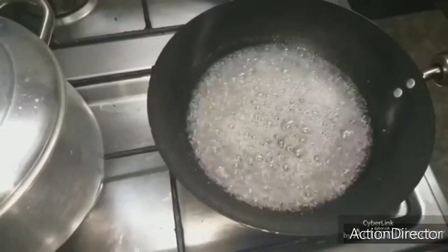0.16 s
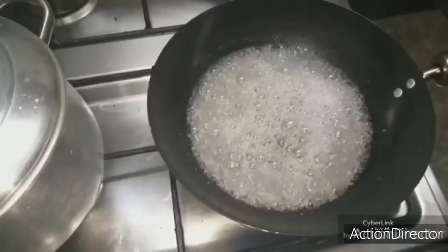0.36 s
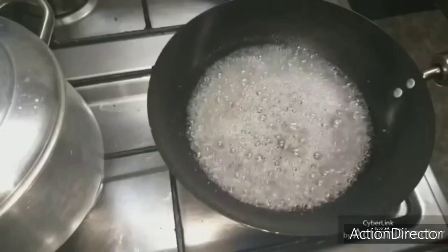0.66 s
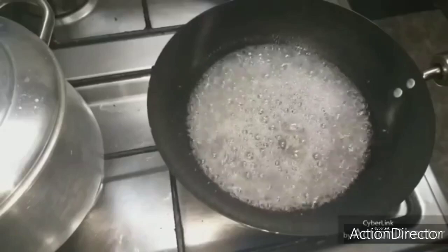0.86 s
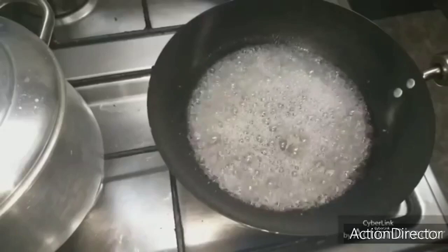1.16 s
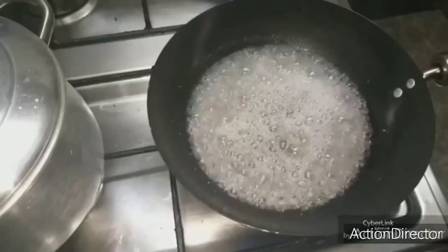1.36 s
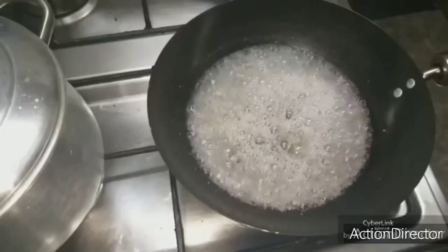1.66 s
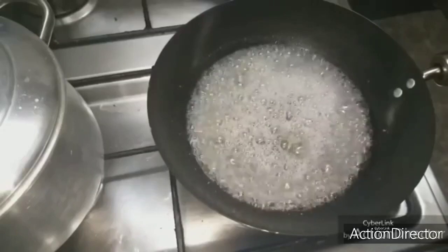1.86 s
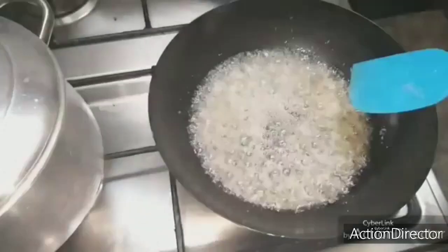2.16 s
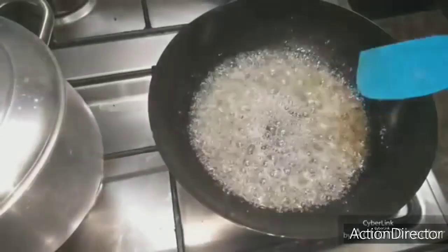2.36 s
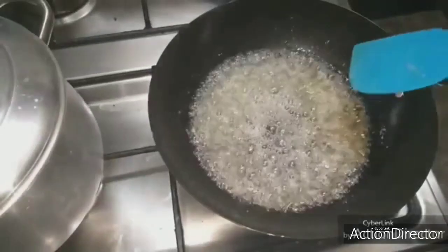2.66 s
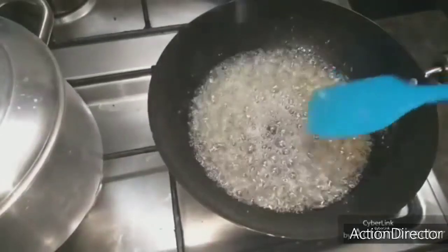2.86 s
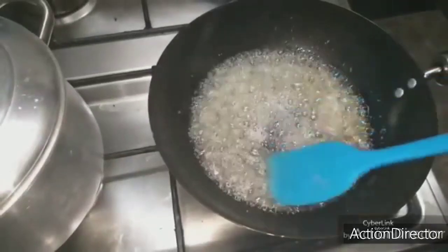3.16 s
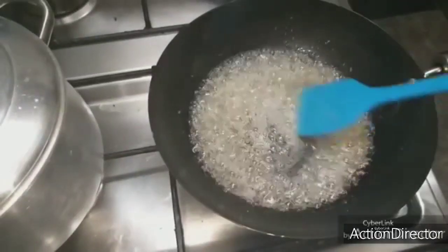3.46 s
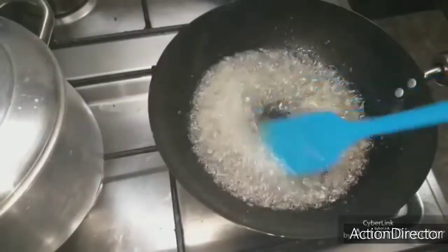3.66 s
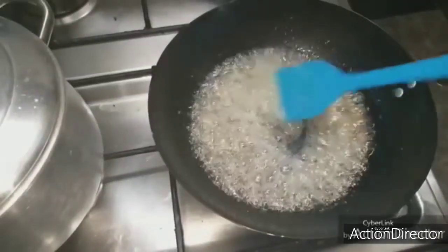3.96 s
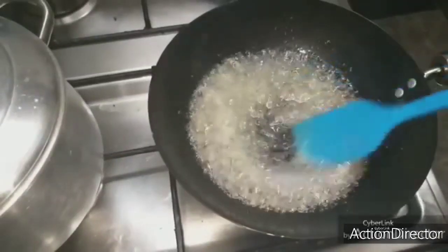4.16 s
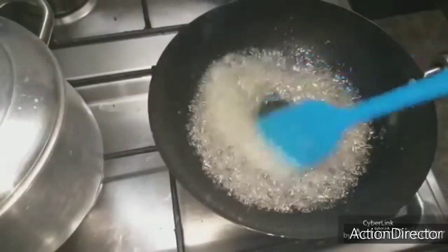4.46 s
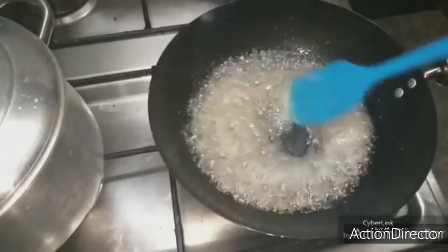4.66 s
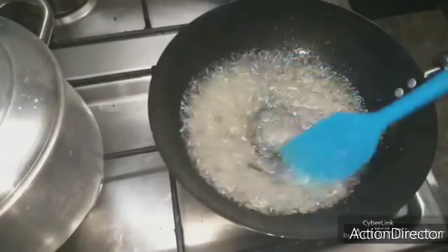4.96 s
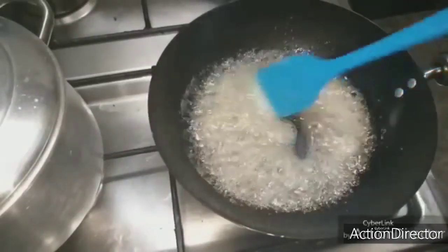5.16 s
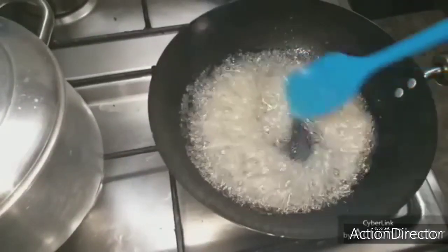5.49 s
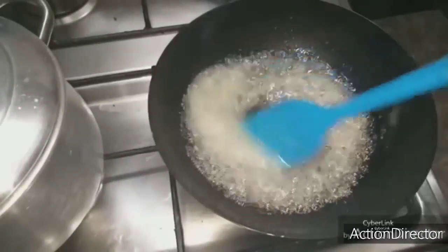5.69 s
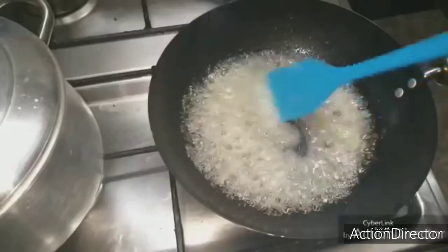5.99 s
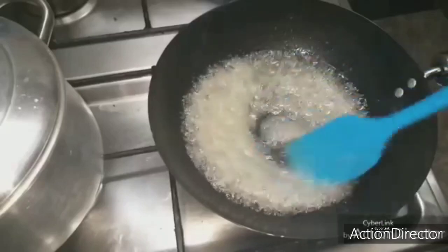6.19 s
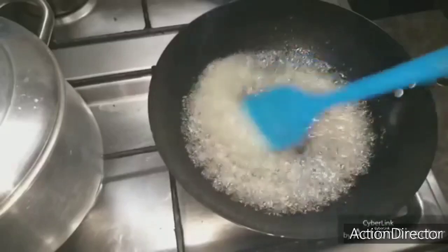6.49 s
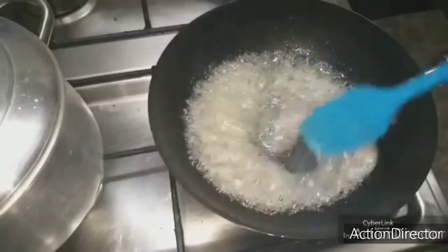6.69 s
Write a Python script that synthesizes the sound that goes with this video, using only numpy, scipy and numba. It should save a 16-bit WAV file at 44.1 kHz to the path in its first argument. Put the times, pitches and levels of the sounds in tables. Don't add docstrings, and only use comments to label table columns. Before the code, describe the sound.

Sugar syrup boils hard in a pan with dense bright sizzling, then abruptly drops to a quieter flame hiss as a spatula stirs fizzing foam.

```python
import sys
import numpy as np
from scipy import signal
from scipy.fft import rfft, irfft
from scipy.io import wavfile
from scipy.ndimage import uniform_filter1d
from numba import njit

SR = 44100
rng = np.random.default_rng(int(sys.argv[2]) if len(sys.argv) > 2 else 0)


def ratio(d):
    e = np.asarray(d, float) / 20
    return 10 ** e


def dump_mix(stems):
    frames = np.atleast_2d(stems).T
    limited = np.clip(frames, -1, 1)
    pcm = np.round(limited * 32767).astype(np.int16)
    wavfile.write(sys.argv[1], SR, pcm)


N = 301203
T = np.arange(N) / SR
HZ = np.maximum(np.arange(N // 2 + 1) * SR / N, 1)
CUT_S = 2.227
TOP_HZ = 15010

# time_s, level_db
BOIL = [(0, -1.2), (.42, 0.8), (.8, -0.2), (1.4, 0), (1.75, 1), (2.05, 0), (2.23, -0.5)]
# time_s, level_db
STIR = [(2.23, -3.5), (2.9, -8.5), (3.3, -4), (3.7, -2.5), (4.1, -3), (4.5, -2.5), (4.8, 0.5), (5.2, 1),
        (5.5, 0.5), (5.7, -2), (6.0, -2.5), (6.6, -3), (6.83, 0.5)]
# time_s, level_db
FLAME = [(2.23, -1.5), (3.7, -0.5), (4.2, -1), (4.75, 3), (5.3, -0.2), (5.8, -1), (6.4, -2), (6.83, 0.5)]

# freq_hz, density_db (per Hz)
BOIL_COLOUR = [(18, -63), (30, -25), (64, -15.5), (87, -12.5), (183, 0), (238, -9.5), (315, -4),
               (629, -9.5), (787, -3), (1300, -11), (1930, -9.5), (2600, -8.5), (3380, -44), (5720, -120)]
# freq_hz, density_db (per Hz)
STEAM_COLOUR = [(1350, -32), (2300, 0.5), (2590, -3.5), (3560, -3), (4010, 0), (4800, -3), (6350, -3),
                (9110, -5), (10500, -10), (12400, -8), (14900, -11)]
# freq_hz, density_db (per Hz)
FLAME_COLOUR = [(18, -55), (30, -12), (64, -12.5), (96, -0.5), (181, 0), (237, -9), (328, -13),
                (375, -16.5), (437, -15), (620, -15.5), (790, -9), (1250, -16), (1830, -4.5), (2900, -14),
                (3770, -47), (6380, -120)]
# freq_hz, density_db (per Hz)
GAS_COLOUR = [(1530, -43), (2600, -15.5), (3210, -10), (3430, -9.5), (3830, -1), (4560, -14), (4700, -7),
              (4980, -9.5), (6430, -1), (7070, -7.5), (8740, -5.5), (9680, 0.5), (10600, -6), (14200, -8),
              (14900, -16.5)]
# freq_hz, level_db
FLAT = [(1, 0), (2, 0)]
# freq_hz, level_db
TILES = [(1200, -40), (2500, 0), (14000, 4)]
# freq_hz, width_hz, lift_db
HOLLOWS = [(98.2, 4.7, 10), (155, 12, -1), (176, 8.4, 1), (194.3, 33, 5), (281.4, 22, 5.5),
           (316.3, 5.8, 7.5), (455.3, 9.6, 6), (790, 58, 3.5), (908, 9.6, 7), (1055, 40, 4),
           (1470, 31, 1.5), (1950, 94, 4.5)]

# start_s, peak_db, pitch_hz
BOIL_POPS = [(0.0684, -30, 5800), (0.3616, -35, 4500), (0.4345, -24.5, 8400), (0.526, -31, 4070),
             (.6295, -27, 8000), (.9552, -29, 6800), (0.986, -34, 6240), (.7996, -26.5, 7650),
             (1.063, -27, 8030), (1.0843, -31, 3960), (1.432, -28, 6070), (1.5708, -33, 4630),
             (1.6417, -35, 6100), (1.938, -34, 4100), (2.0575, -31.5, 4470), (2.176, -33, 6430),
             (2.184, -32, 5100)]
# start_s, peak_db, pitch_hz
BOIL_SNAPS = [(0.2722, -31, 5001), (0.2867, -32, 5030), (0.2985, -40, 11400), (0.3776, -31, 5800),
              (0.4101, -32, 5745), (0.5643, -33, 3790), (0.7865, -33, 9000), (0.8051, -32, 7581),
              (1.0046, -37, 5745), (1.0395, -31, 4320), (1.1123, -32, 11491), (1.1509, -31, 11491),
              (1.1722, -35.6, 11491), (1.2949, -33, 8708), (1.3019, -36, 6600), (1.3978, -42, 3790),
              (1.4085, -30, 11491), (1.4155, -33, 5745), (1.4824, -34.8, 8708), (1.5287, -35, 4354),
              (1.6552, -38.1, 3760), (1.7806, -40, 11491), (1.8806, -30.5, 4430), (1.9053, -29, 10003),
              (1.9502, -33, 11491), (1.9609, -37, 3300), (2.0994, -34.4, 7581), (2.1409, -30, 11491),
              (2.1974, -36, 6600), (2.2148, -37, 3800)]
# start_s, peak_db, pitch_hz
POPS = [(2.8826, -39, 5320), (2.9284, -36, 5570), (3.3929, -39, 7610), (3.753, -33, 5000),
        (3.865, -35, 4900), (4.063, -32, 5800), (4.2325, -28, 5470), (4.337, -32, 6500),
        (4.392, -32.5, 6170), (4.5045, -31.5, 4770), (4.52, -36, 4200), (4.6325, -33, 4760),
        (4.7985, -35, 5550), (4.9287, -37, 4030), (4.9557, -44, 6150), (5.0121, -35, 4860),
        (5.2968, -37, 4960), (5.3194, -31.5, 5840), (5.3982, -44, 6300), (5.506, -32, 5600),
        (5.6212, -34, 4870), (5.7168, -30.5, 4800), (5.8498, -37.5, 4630), (6.0417, -37, 5600),
        (6.256, -35, 6810), (6.367, -27, 6300), (6.4149, -37, 6100), (6.4834, -35, 6380),
        (6.6697, -34, 4100), (6.6798, -34.5, 5970)]
# start_s, peak_db, pitch_hz
SNAPS = [(2.5171, -47, 11491), (2.6933, -41, 6600), (2.8513, -42, 7581), (3.0287, -51.4, 4354),
         (3.2209, -48, 5745), (3.2906, -44, 6600), (3.3654, -42.6, 5750), (3.6615, -41.0, 11470),
         (3.6695, -46.0, 5001), (3.6735, -41, 6600), (3.6976, -44, 5001), (3.7241, -42, 6600),
         (3.7831, -45, 7581), (3.8801, -48, 5745), (3.8896, -48.8, 5001), (3.9581, -42.9, 5001),
         (3.964, -47.9, 3790), (3.9906, -41, 5745), (4.0112, -40, 5001), (4.0915, -47.4, 5001),
         (4.1822, -46, 10003), (4.2005, -47, 3790), (4.2121, -40, 6550), (4.2881, -46, 4354),
         (4.3085, -48, 4354), (4.3175, -45, 5745), (4.3497, -42, 4354), (4.4023, -43, 3790),
         (4.4398, -44.3, 5745), (4.5711, -44, 3300), (4.5817, -41, 6560), (4.6862, -43, 4354),
         (4.7384, -45, 3280), (4.786, -42, 3260), (4.8783, -44, 3250), (4.8847, -42, 4880),
         (4.9674, -41.6, 5745), (5.1491, -36, 10003), (5.1531, -41, 3260), (5.2112, -41.9, 5001),
         (5.23, -43.9, 4354), (5.3287, -38, 5745), (5.3511, -44, 3800), (5.3636, -45.1, 5745),
         (5.3722, -48, 6600), (5.4062, -49, 3790), (5.4457, -43.8, 5001), (5.5497, -46.7, 6600),
         (5.6071, -45, 5001), (5.657, -44.2, 5745), (5.7813, -46, 4380), (5.8432, -42, 5745),
         (6.0631, -46, 4354), (6.2003, -49, 6600), (6.245, -48.8, 5001), (6.2765, -43.1, 5001),
         (6.3729, -59, 3790), (6.396, -45.3, 5001), (6.5203, -52, 5001), (6.7565, -46, 3770)]
# start_s, peak_db, pitch_hz
PINPRICKS = [(.0692, -35, 9420), (.1351, -34, 9450), (0.4564, -29, 8000), (0.461, -28, 8700),
             (0.654, -29, 11800), (.689, -30, 13500), (0.9865, -28, 8800), (1.0844, -27.5, 8100),
             (1.465, -30, 9060), (1.5716, -29, 9200), (1.7424, -28, 9110), (1.8148, -33, 9050),
             (4.2268, -32.5, 8230), (4.6498, -39, 8490), (4.6499, -27, 7160), (5.43, -39, 2960),
             (5.436, -32, 9190), (2.4065, -39, 5000), (2.4617, -40, 4230), (3.0465, -40, 5500),
             (3.5584, -39, 5200), (5.677, -34, 8050), (5.825, -40, 4480), (6.224, -35, 9960),
             (6.355, -35, 9950), (6.7905, -32, 13200), (6.7955, -36, 7200)]
# start_s, peak_db, pitch_hz
TICKS = [(4.527, -38.5, 1550), (4.5394, -43, 2000), (4.568, -46, 1850), (4.5927, -38, 2200),
         (5.154, -42, 1900), (5.328, -38, 1830), (5.414, -41, 1900), (6.3735, -44, 1860)]
# centre_s, half_length_s, centre_hz,
# level_db
SWISHES = [(2.47, .043, 4300, -64), (3.65, 0.044, 4300, -64), (4.01, 0.04, 3980, -58.5),
           (4.30, .04, 5800, -63), (4.43, 0.053, 5170, -59.5), (4.506, .03, 4500, -74),
           (4.797, 0.018, 5500, -59), (4.96, 0.018, 6200, -61), (5.014, 0.046, 4740, -57),
           (5.141, 0.046, 3930, -54), (5.145, 0.083, 2000, -59), (5.217, 0.026, 4770, -62),
           (5.42, .022, 4580, -57.5), (5.638, 0.072, 4670, -63), (5.854, 0.036, 4600, -67),
           (6.273, 0.027, 4840, -63), (6.436, 0.038, 5030, -57), (6.688, 0.027, 4430, -60.5)]
# start_s, held_s, pitch_hz, level_db, unsteadiness_db
SQUEAKS = [(4.388, 0.046, 1365, -59.5, 1), (4.43, .02, 1376, -64, 2), (4.458, .016, 1380, -67, 1.5),
           (4.562, 0.019, 800, -65, 3), (4.618, .008, 1880, -60, 5), (4.63, 0.015, 1770, -58, 1.5),
           (5.948, 0.024, 1570, -66, 2.5), (6.44, 0.016, 800, -68, 2), (6.445, 0.039, 1470, -71, -2),
           (6.662, 0.015, 1550, -60, -4), (6.666, .008, 1050, -61, 2), (6.679, 0.033, 1035, -64, 4),
           (6.713, .03, 1046, -66, -4), (6.69, .04, 1620, -72, 3)]

# start_s, ring_db, contact_s, room_db
KNOCKS = [
    (2.6, -41, .0015, -55.5),
    (4.6504, -26, 0.0019, -42.5),
    (5.4299, -36, 0.00056, -47.5),
    (6.791, -52, .0006, -60),
]
# pitch_hz, level_db, t60_s
THUD = [(96, -22, 0.06), (148, 0, 0.068), (330, -15, 0.018), (534, -6, 0.03), (804, -7, 0.032)]
# pitch_hz, level_db, t60_s
RAP = [(107.6, -28, 0.56), (800, 2.5, 0.018), (1240, -7, 0.05), (1470, -11, 0.029), (2000, -15.5, 0.12),
       (2810, -18, 0.033), (4300, 3, 0.0068), (6000, 4.5, 0.011), (6750, -4, 0.026)]
# pitch_hz, level_db, t60_s
TAP = [(1850, -1, 0.034), (2450, -4, 0.025), (3000, -7, .016), (4000, -2, .016), (4900, -4, .012)]
# pitch_hz, level_db, t60_s
TINKLE = [(5800, 1, .04), (7250, -5, 0.09), (8400, -1, .06), (12800, 0, .025), (13640, 0, .2),
          (13850, -1.5, .12), (14500, -4, .04)]
# freq_hz, density_db (per Hz)
TAILS = [
    [(41, -40), (75, -4), (120, -0.5), (172, -4), (257, -12), (663, -11), (741, -12), (1000, -15),
     (1300, -42), (2200, -120)],
    [(41, -48), (75, -17), (105, -4), (265, -11.5), (560, -12), (800, -12), (1080, -7), (1220, -4.5),
     (1700, -6.5), (2000, -5.5), (2610, -12), (2880, -13), (7500, -16.5), (9750, -28), (16500, -120)],
    [(41, -39), (70, -19), (297, -1), (508, -4), (676, -2.5), (1480, -3), (1740, -0.5), (3440, -12),
     (5000, -13), (6500, -45), (11000, -120)],
    [(2940, -44), (5000, -11), (6960, -1), (9880, -4), (11500, -11), (14000, -5), (14800, -21)],
]
# start_s, peak_db, pitch_hz, length_cycles
PAN_RINGS = [(.46, -52, 450, 27), (.13, -47, 790, 28), (2.603, -46, 155, 1), (2.603, -41.5, 820, 2.4),
             (2.61, -49, 850, 3), (2.615, -50, 420, 1.4), (2.62, -48, 140, 2.5), (2.612, -51, 430, 3),
             (2.626, -52, 450, 3), (2.641, -51, 160, 1.6), (2.676, -51, 170, 1.4), (2.697, -49, 190, 1.1),
             (2.724, -54, 155, 1.6), (4.6533, -28, 1310, 2.3), (4.664, -45, 1240, 2.5),
             (4.667, -37, 1700, 2.5), (4.679, -36, 800, 3), (4.6522, -33.5, 800, 2.6),
             (4.6625, -36, 950, 1.5), (4.686, -40, 1900, 2.5), (4.705, -36, 2050, 5), (5.434, -40, 1790, 5),
             (5.439, -46, 1800, 4), (5.4415, -43.5, 695, 2.3), (5.446, -46, 1500, 2.5), (5.455, -45, 2500, 3),
             (5.47, -42, 700, 2), (5.479, -49, 910, 2.7), (5.5, -59, 500, 2.8), (5.51, -45, 1590, 4),
             (5.525, -46, 1640, 5), (5.458, -48, 1850, 4), (5.489, -43, 1700, 2.7)]
# freq_hz, t60_s
KITCHEN_T60 = [(100, 0.49), (500, 0.44), (1500, 0.37), (5000, 0.26), (14000, 0.082)]
# centre_hz, width_hz, in_step_share, unrelated_share
SIDE_BANDS = [(30, 47, 0.093, 0.11), (500, 470, 0, 0.0051), (1915, 263, 0.24, 0.19), (6300, 3000, 0, 0.012),
              (9760, 690, -0.17, 0.22)]

FIZZ_DB, BURBLE_DB, ROAR_DB = -46.5, -50.5, -59
FOAM_DB, SCRAPE_DB = -61, -64
FOAM_FOLLOWS, SCRAPE_FOLLOWS = 1.06, 1
SWISH_WIDTH = 0.52
RUMBLE_DB, BODY_DB, WHISTLE_DB, GAS_DB = -65, -68.5, -70.5, -59
BODY_FOLLOWS, WHISTLE_FOLLOWS, GAS_FOLLOWS = 1, 0.89, 0.077
SING_DB, WHISTLE_SETTLES_S = -66, 0.96
CRACKLE_DB, CRACKLE_SCATTER_DB, CRACKLE_FOLLOWS = -49, 2, 0.31
CRACKLE_LO_HZ, CRACKLE_HI_HZ = 3830, 6860
CRACK_DB = 0
SNAP_LIFT_DB, BOIL_SNAP_LIFT_DB = 3.5, 0.5
SPIT_DB, SPIT_S, SPIT_SPREAD = -7, .006, 0.22
WAVER = .016
PATCH_RATE = 6
BOIL_ROOM_DB, FLAME_ROOM_DB, SQUEAK_ROOM_DB = -15, -11, -10


def boil():
    vigour_db, = curves(BOIL)
    small = bubbles(count=22000, lo_hz=2500, hi_hz=16000, cycles=1.8, spread_db=2.5)
    fizz = ratio(-8.0) * small + ratio(-5.0) * hiss(0.65, 25.53, patchy_db=0.8)
    fat = bubbles(count=3000, lo_hz=295, hi_hz=2890, cycles=1.9, spread_db=1.5)
    burble = ratio(-18.5) * fat + hiss(0.85, 24.15)
    fizz_db = FIZZ_DB + vigour_db + 1.25 * walk(29.56) + 0.69 * walk(12.02)
    out = ratio(fizz_db) * band(fizz, 2430, 15000, STEAM_COLOUR)
    out += ratio(BURBLE_DB + vigour_db) * band(burble, 464, 2340, BOIL_COLOUR)
    return out + ratio(ROAR_DB) * band(hiss(3.0, 9.8), 10, 367, BOIL_COLOUR)


def stirring():
    effort_db, = curves(STIR)
    fizz = bubbles(count=20000, lo_hz=3440, hi_hz=8000, cycles=1.8, spread_db=3.0)
    out = ratio(FOAM_DB + FOAM_FOLLOWS * effort_db) * ratio(2.0 * walk(40)) * fizz
    out += swishes()
    grains = bubbles(count=5000, lo_hz=594, hi_hz=3280, cycles=2.3, spread_db=0.5)
    drag = ratio(-15.0) * grains + hiss(2.4, 30)
    scrape = band(drag, 840, 4000, [(900, -7.5), (1600, 3.5), (3000, -9.0)])
    return out + ratio(SCRAPE_DB + SCRAPE_FOLLOWS * effort_db) * scrape


def swishes():
    out = np.zeros(N)
    foam = rfft(bubbles(count=60000, lo_hz=800, hi_hz=9260, cycles=2.9, spread_db=3.0))
    for s, half, hz, db in SWISHES:
        part = irfft(foam * np.exp(-(2 * (HZ / hz - 1) / SWISH_WIDTH) ** 2 / 2), N)
        shape = np.exp(-((T - s) / half) ** 2)
        rms = np.sqrt(np.sum((shape * part) ** 2) / np.sum(shape ** 2))
        out += ratio(db) * shape * part / rms
    return out


def pops():
    s, db, hz = np.transpose(BOIL_POPS + POPS + PINPRICKS + crackle(count=36))
    out = rings(s + .0005, .94 * hz, 2.1 / hz, 1.8 / hz, ratio(db + 6.), .06)
    out += ratio(CRACK_DB) * rings(s + .0005, 1.35 * hz, 1.1 / hz, .6 / hz, ratio(db), 0.)
    for snaps, lift_db in (SNAPS, SNAP_LIFT_DB), (BOIL_SNAPS, BOIL_SNAP_LIFT_DB):
        s, db, hz = np.transpose(snaps)
        out += ratio(lift_db) * rings(s + .0002, .95 * hz, 2.1 / hz, 1.7 / hz, ratio(db + 5.), .06)
    out += spits(BOIL_POPS + BOIL_SNAPS + PINPRICKS[:11])
    s, db, hz = np.transpose(TICKS)
    return out + rings(s, hz, 0.88 / hz, 0.43 / hz, ratio(db + 6.5), 0.)


def crackle(count):
    when, pitch, big = rng.random((count, 3)).T
    s = CUT_S + (N / SR - CUT_S) * when
    effort_db = np.interp(s, *np.transpose(STIR))
    db = CRACKLE_DB + CRACKLE_FOLLOWS * effort_db + CRACKLE_SCATTER_DB * (2 * big - 1)
    hz = CRACKLE_LO_HZ * (CRACKLE_HI_HZ / CRACKLE_LO_HZ) ** pitch
    return list(zip(s, db, hz))


def spits(bursts, count=7):
    s, db, hz = np.repeat(bursts, count, axis=0).T
    late, pitch = rng.random((len(s), 2)).T
    hz = np.minimum(hz * (1 + SPIT_SPREAD * (2 * pitch - 1)), TOP_HZ)
    return rings(s + SPIT_S * late, hz, 3.1 / hz, 1.6 / hz, ratio(db + SPIT_DB), 0.036)


def squeaks():
    out = np.zeros(N)
    for s, held, hz, db, unsteady_db in SQUEAKS:
        age = np.maximum(T - s, 0)
        shape = (1 - np.exp(-age / 0.008)) * np.exp(-(age / held) ** 4)
        phase = 2 * np.pi * np.cumsum(hz * (1 + WAVER * walk(200))) / SR
        out += ratio(db + 9.5 + unsteady_db * walk(100)) * shape * np.sin(phase)
    return walled(out, SQUEAK_ROOM_DB, FLAT)


def knocks():
    s, db, hz, cycles = np.transpose(PAN_RINGS)
    out = rings(s, hz, cycles / hz, 0.098 / hz, ratio(db), 0.)
    for (s, db, contact, room_db), modes, tail in zip(KNOCKS, (THUD, RAP, TAP, TINKLE), TAILS):
        hz, mode_db, t60 = np.transpose(modes)
        sign = (-1.) ** np.arange(len(hz))
        size = sign * ratio(db + mode_db)
        ring = rings(s + 0 * hz, hz, t60 / np.log(1000), contact + 0 * hz, size, 0.)
        slap = kitchen(tail)
        start = int(s * SR)
        early_rms = np.std(slap[:SR // 20])
        out[start:start + SR] += ratio(room_db) * slap[:N - start] / early_rms
        out += walled(ring, -12.5, FLAT)
    return out


def flame():
    size_db, = curves(FLAME)
    out = ratio(RUMBLE_DB + size_db) * band(hiss(2.76, 8), 10, 480, FLAME_COLOUR)
    out += ratio(BODY_DB + BODY_FOLLOWS * size_db) * band(hiss(2.4, 5), 320, 1010, FLAME_COLOUR)
    whistle_db = WHISTLE_DB + WHISTLE_FOLLOWS * size_db
    out += ratio(whistle_db) * band(hiss(3.2, 5.08), 1250, 3000, FLAME_COLOUR)
    settling = np.exp(-((T - CUT_S) / WHISTLE_SETTLES_S) ** 2)
    out += ratio(SING_DB) * settling * band(hiss(1.9, 12), 1950, 2000, FLAT)
    simmer = bubbles(count=9000, lo_hz=2500, hi_hz=15500, cycles=3, spread_db=2.2)
    gas = hiss(1.6, 20, patchy_db=1.5) + ratio(-7.5) * simmer
    gas_db = GAS_DB + GAS_FOLLOWS * size_db + 0.61 * walk(13)
    return out + ratio(gas_db) * band(gas, 2750, 16000, GAS_COLOUR)


def kitchen(colour):
    t, hz = T[:SR], np.arange(1., SR // 2 + 2)
    spectrum = rfft(rng.standard_normal(SR)) * ratio(on_log(hz, colour))
    out = np.zeros(SR)
    for lo in 40 * 2 ** np.arange(9):
        part = irfft(spectrum * ((hz >= lo) & (hz < 2 * lo)), SR)
        out += part * ratio(-60 * t / on_log(1.4 * lo, KITCHEN_T60))
    out *= (1 - np.exp(-t / .004)) * ratio(1.5 * walk(300)[:SR])
    return out / np.sqrt(np.sum(out ** 2))


def walled(x, room_db, colour=TILES):
    return x + ratio(room_db) * signal.fftconvolve(x, kitchen(colour))[:N]


def bubbles(count, lo_hz, hi_hz, cycles, spread_db):
    when, pitch, big = rng.random((count, 3)).T
    hz = lo_hz + (hi_hz - lo_hz) * pitch
    size = ratio(-spread_db * np.log(big + 1e-3)) * np.sqrt(hz)
    return unit(rings(when * N / SR, hz, cycles / hz, 0.18 * cycles / hz, size, 0.055))


@njit
def rings(start, hz, decay, rise, size, glide):
    out = np.zeros(N)
    for k in range(len(start)):
        i0 = int(start[k] * SR)
        phase = 0.
        for j in range(min(int(6 * decay[k] * SR), N - i0)):
            t = j / SR
            phase += 2 * np.pi * hz[k] * (1 + glide * t / decay[k]) / SR
            shape = np.exp(-t / decay[k]) * (1 - np.exp(-t / rise[k]))
            out[i0 + j] += size[k] * np.sin(phase) * shape
    return out


def hiss(flicker_db, rate, patchy_db=0):
    spectrum = rfft(rng.standard_normal(N))
    out = np.zeros(N)
    edges = np.searchsorted(HZ, 40 * 2 ** np.arange(0, 9, 1 / 3))
    for lo, hi in zip(np.r_[0, edges[1:-1]], edges[1:]):
        part = np.zeros_like(spectrum)
        part[lo:hi] = spectrum[lo:hi]
        level_db = flicker_db * walk(rate)
        if patchy_db:
            level_db = level_db + patchy_db * walk(PATCH_RATE)
        out += ratio(level_db) * irfft(part, N)
    return unit(out)


def band(x, lo_hz, hi_hz, colour):
    db = on_log(HZ, colour)
    for f, width, lift in HOLLOWS:
        db = db + lift / (1 + (2 * (HZ - f) / width) ** 2)
    edges = 1 / np.sqrt((1 + (lo_hz / HZ) ** 12) * (1 + (HZ / hi_hz) ** 12))
    return unit(irfft(rfft(x) * ratio(db) * edges, N))


def walk(rate):
    k = int(SR / rate)
    steps = np.repeat(rng.standard_normal(N // k + 1), k)
    return 1.2 * uniform_filter1d(uniform_filter1d(steps, k), k)[:N]


def curves(table):
    s, *columns = np.transpose(table)
    return [np.interp(T, s, c) for c in columns]


def on_log(hz, table):
    points_hz, values = np.transpose(table)
    return np.interp(np.log(hz), np.log(points_hz), values)


def unit(x):
    return x / np.sqrt(np.mean(x ** 2))


def scene():
    before = np.clip((CUT_S - T) / .002, 0, 1)
    high = walled(boil(), BOIL_ROOM_DB)
    low = walled(flame() + stirring(), FLAME_ROOM_DB)
    singles = walled(pops(), -9, FLAT)
    mid = before * high + (1 - before) * low + singles + squeaks() + knocks()
    return np.array([mid, mid])


def top_cut(x):
    return signal.sosfilt(signal.butter(12, 15550, fs=SR, output="sos"), x)


def record(dry):
    spectrum = rfft(dry[0]) * (HZ < TOP_HZ)
    late = np.exp(-2j * np.pi * HZ * .012)
    share = 0.0032 * late
    for f, width, same, other in SIDE_BANDS:
        share = share + (same + other * late) * np.exp(-((HZ - f) / width) ** 4)
    mid = irfft(spectrum, N)
    side = irfft(spectrum * share, N) * ratio(1.8 * walk(12))
    return top_cut(np.array([mid + side, mid - side]))


dry = scene()
out = record(dry)
dump_mix(out)
```